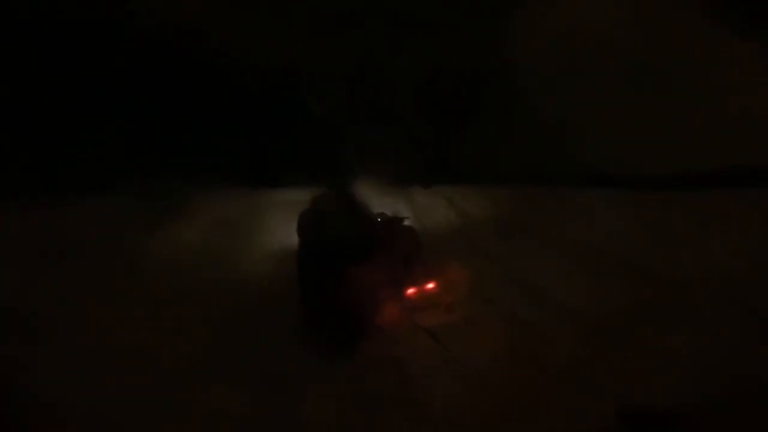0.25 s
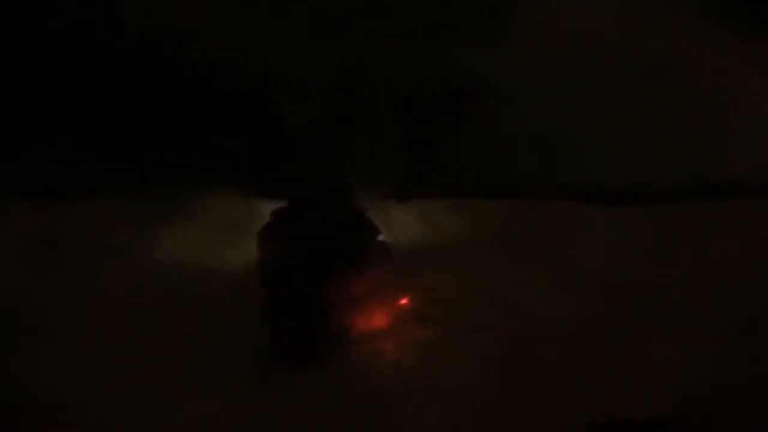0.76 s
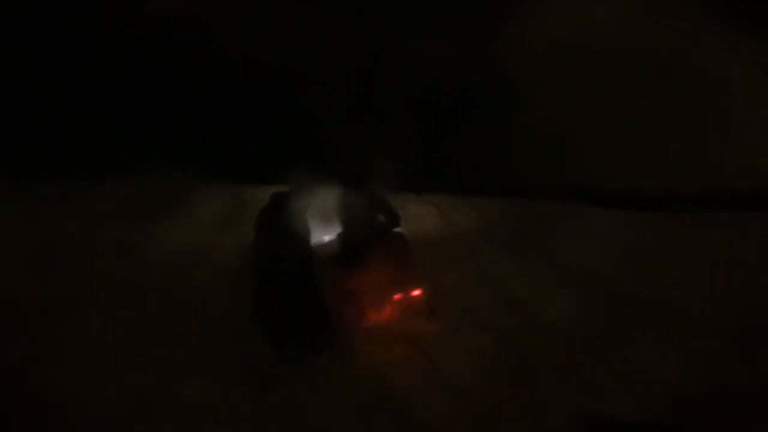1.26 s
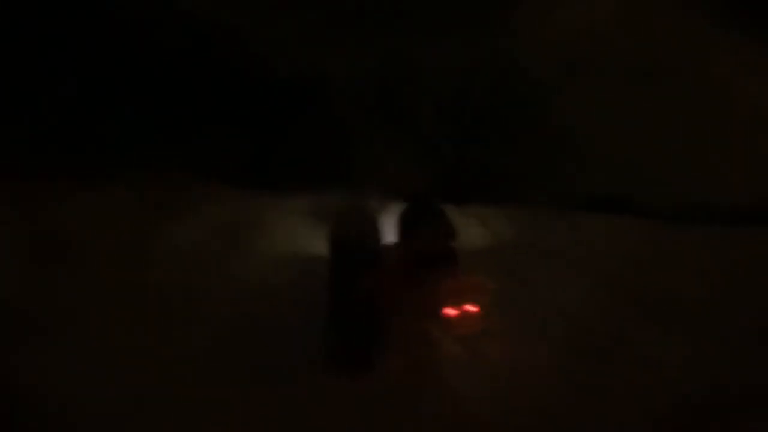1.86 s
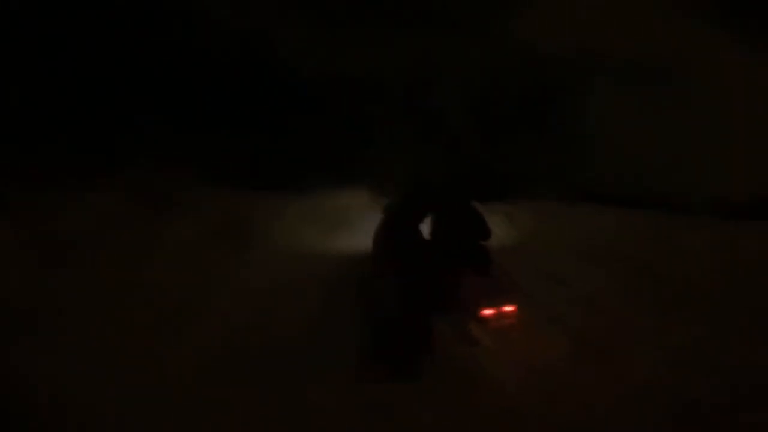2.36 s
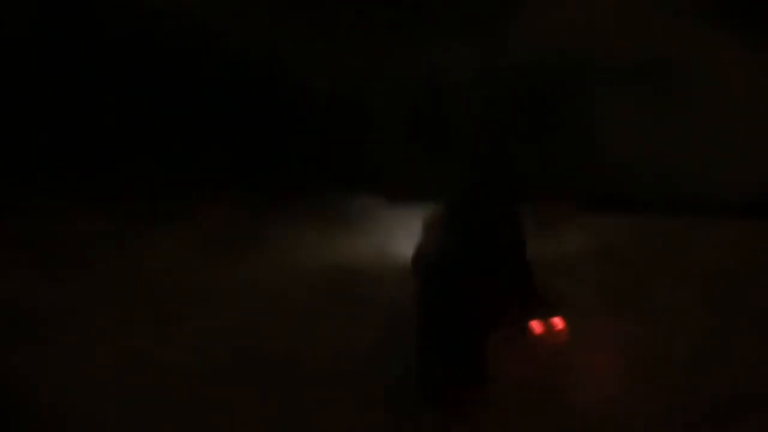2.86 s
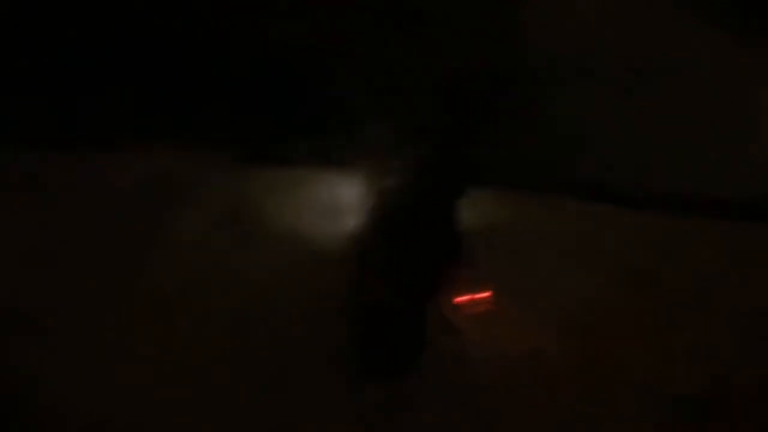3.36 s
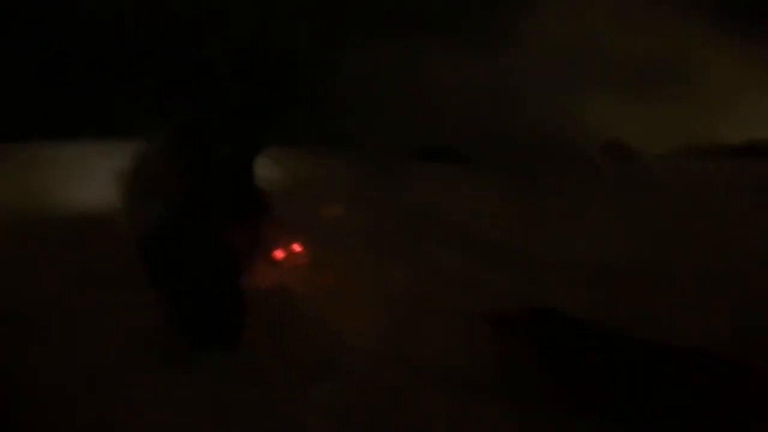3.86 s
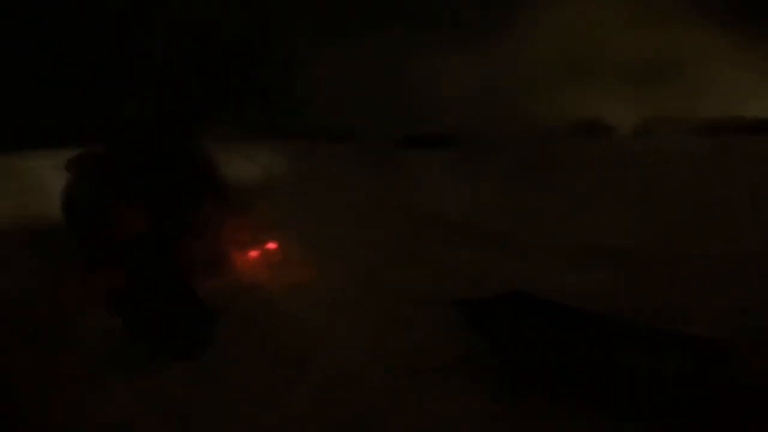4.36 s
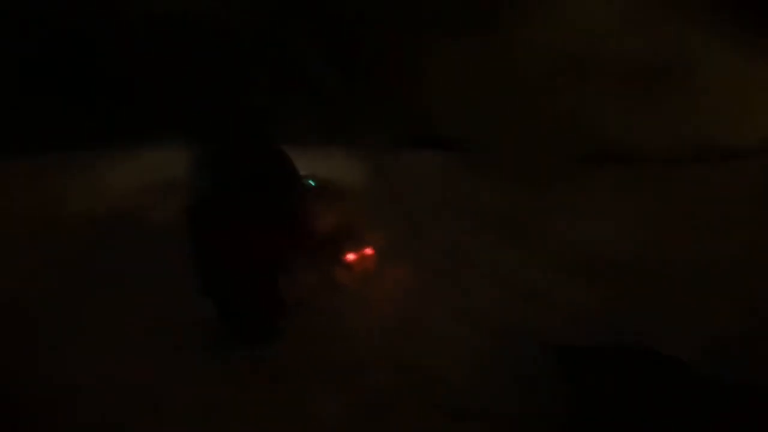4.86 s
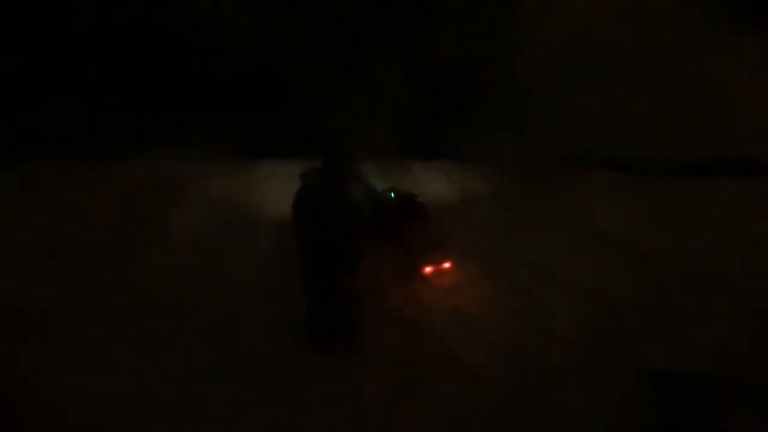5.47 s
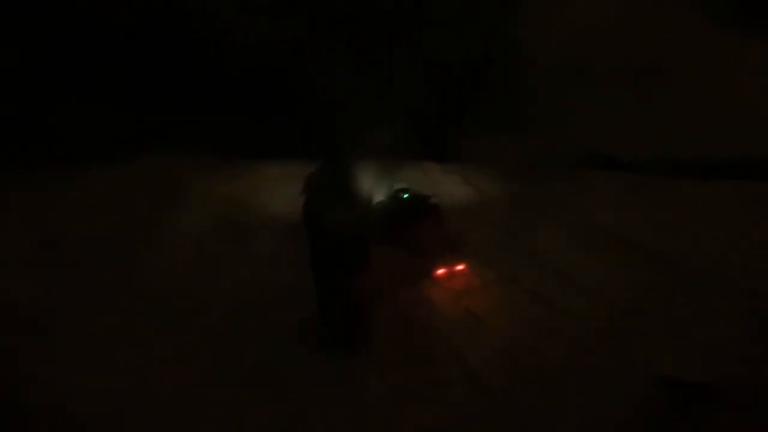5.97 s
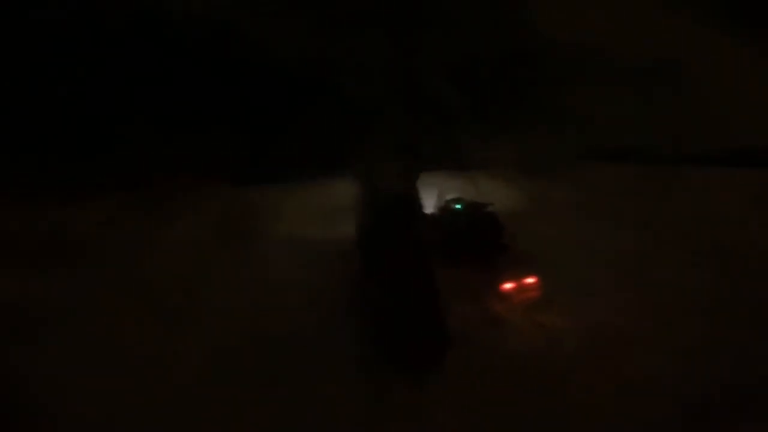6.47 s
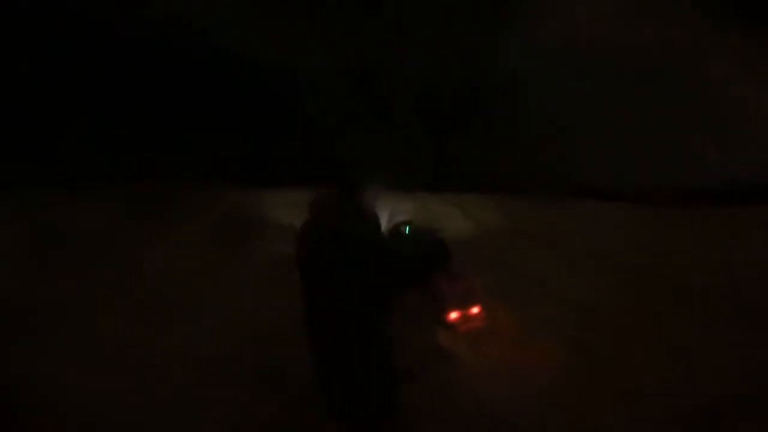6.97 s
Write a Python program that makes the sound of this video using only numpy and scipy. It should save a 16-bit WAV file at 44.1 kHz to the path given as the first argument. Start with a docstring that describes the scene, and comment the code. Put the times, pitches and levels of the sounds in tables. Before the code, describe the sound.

Outdoors on snow, a fairly quiet snowmobile engine throbs, rattles and hisses. Its pitch rises to a higher, whining drone, peaks briefly and falls back to an even idle that lasts to the end. From the top of the rev onward, a handful of much louder, very short ticks hit the microphone housing at uneven intervals. Soft gusts rumble on the microphone, and everything sounds dry.

```python
"""A two-stroke snowmobile idles on open snow at night, its exhaust throbbing while clutch, cylinders and
belt clatter and hiss through the cowling. Light wind rumbles on the hand-held mono microphone.
Just after one second the engine revs once to creep forward: the pipe rings and the clutch whine climbs.
Around three seconds it sinks back to a smoother idle and stays there. Sharp ticks ring the
microphone's housing along the way, the loudest between two and six seconds."""
import sys
import numpy as np
from scipy import signal
from scipy.fft import rfft, irfft
from scipy.io import wavfile
from scipy.ndimage import uniform_filter1d

SR = 44100
rng = np.random.default_rng(int(sys.argv[2]) if len(sys.argv) > 2 else 0)


def store_pcm(level_fs):
    """Save levels as 16-bit WAV."""
    pcm = np.round(np.clip(level_fs, -1, 1) * 32767).astype(np.int16)
    wavfile.write(sys.argv[1], SR, np.atleast_2d(pcm).T)


N = 318428
TIME = np.arange(N) / SR
FREQS = np.fft.rfftfreq(N, 1 / SR)


def undb(db):
    """Decibels to gain."""
    return 10 ** (np.asarray(db) / 20)


def unit(x):
    """Scale to rms 1."""
    return x / np.sqrt(np.mean(x ** 2))


def curve(points):
    """An automation line through (seconds, value) points."""
    return np.interp(TIME, *np.transpose(points))


def swell(s, length):
    """A bell-shaped fade around time s; length is the spread to either side."""
    return np.exp(-((TIME - s) / length) ** 2 / 2)


def drift(rate):
    """Smooth random motion of rms 1 that changes about rate times a second."""
    return unit(irfft(rfft(rng.standard_normal(N)) / (1 + (FREQS / rate) ** 4), N))


def noise(colour):
    """Noise of rms 1 through an EQ curve of (Hz, dB) points."""
    hz, db = np.transpose(colour)
    eq = undb(np.interp(np.log(FREQS + 1), np.log(hz), db))
    return unit(irfft(rfft(rng.standard_normal(N)) * eq, N))


def response(hz, modes):
    """Gain of a set of resonances at the given frequencies."""
    return sum(undb(db) / (1 + ((hz - centre) / width) ** 2 * 2) for centre, width, db in modes)


def ring(x, modes):
    """A sound coloured by resonances, rms 1."""
    return unit(irfft(rfft(x) * response(FREQS, modes), N))


# The wind's bass-heavy EQ. Each row: frequency in Hz, relative level in dB.
WIND_EQ = [(8, -1.5), (20, 4), (35, -11.5), (60, -17.5), (120, -25), (250, -46), (600, -69)]
# Gusts. Each row: peak time in seconds, spread in seconds, level in dB.
GUSTS = [(1.253, .07, -47), (2.47, 0.035, -41), (2.95, 0.15, -39.5), (3.317, 0.023, -47),
         (3.651, 0.027, -43), (3.902, 0.024, -35.5), (4.08, 0.059, -43.5), (4.446, 0.045, -47),
         (4.809, 0.068, -38), (5.418, 0.043, -40), (6.753, 0.12, -38), (6.986, .025, -40)]
# Gusts that bump the microphone. Each row: peak time and spread in seconds, pitch in Hz, level in dB.
BUMPS = [(1.963, 0.04, 71.7, -45), (3.895, .025, 31.6, -38), (3.904, 0.042, 159.9, -54),
         (6.722, 0.037, 143, -56)]

def wind(breeze_db=-48.5):
    """Low eddies at the microphone: a wandering breeze, gusts and a few soft bumps."""
    breeze = undb(breeze_db - 0.5 * drift(4.1))
    gust_power = sum((undb(db) * swell(s, length)) ** 2 for s, length, db in GUSTS)
    out = noise(WIND_EQ) * np.sqrt(breeze ** 2 + gust_power)
    for s, length, hz, db in BUMPS:
        out += ring(rng.standard_normal(N), [(hz, hz / 4, 0)]) * undb(db) * swell(s, length)
    return out


def node_dip(x, hz, depth_db, width=0.66):
    """A broad notch, applied twice: modes with a node at the struck spot hardly answer."""
    w = 2 * np.tan(np.pi * hz / SR)
    b, a = signal.bilinear([1, width * w * undb(-depth_db / 2), w * w], [1, width * w, w * w])
    return signal.lfilter(b, a, signal.lfilter(b, a, x))


# The microphone housing's ring. Each row: pitch in Hz, seconds to fade 60 dB, relative level in dB.
HOUSING_MODES = [(2100, 0.027, -15), (2660, 0.0054, 1), (2537, 0.026, -14), (3440, 0.0039, 5),
                 (4150, 0.0016, 11.5), (6080, 0.0063, 1), (6840, 0.0016, 7.5), (9120, 0.0019, 6),
                 (11900, .0012, -54), (14200, 0.0017, -57)]
# Ticks on the housing. Each row: start in seconds, peak in dB, treble tilt in dB per octave,
# notch centre in Hz, notch depth in dB, rebound gain, rebound delay in seconds.
TICKS = [(.0745, -40, 7, 14000, 1, .3, .00042), (0.434, -35.5, -2, 8000, 4, .3, .00042),
         (0.5727, -26.5, -7, 4500, 29, 0.77, 0.00045), (1.688, -34, 2, 9000, 2, .3, 0.00048),
         (2.1312, 1.5, -6.5, 12400, 1.5, 0.43, 0.000413), (3.0027, -7.5, 7, 8000, 8.5, 0.32, 0.00043),
         (3.0437, -25.5, -1, 4260, 4, 0.56, 0.00047), (3.2906, -12.5, 1.3, 6460, 11, 0.59, 0.000422),
         (3.3709, -3.5, 9.5, 8100, 11, 0.23, .00054), (4.1994, -31.5, 2, 9000, 9, .44, 0.00033),
         (4.6654, -23.5, -9, 3318, 47, 0.78, 0.00021), (4.9944, -0.5, 6, 4740, 34, 0.61, 0.000407),
         (5.3554, -31.5, 7, 9500, 5, .3, 0.00041), (5.5305, -6.5, 12, 11690, 16, 0.66, 0.00043),
         (5.7998, -23.5, 17, 10070, 15, .43, 0.00043), (5.8613, -16.3, 2, 5970, 4.5, 0.32, 0.00041),
         (6.1775, -40, 7, 4300, 2, .3, .00042)]

def ticks(tilt_from_hz=3700):
    """Tiny hard contacts at the microphone: each strikes, rebounds and briefly rings the housing."""
    out, t = np.zeros(N), TIME[:SR // 25]
    low_cut = signal.butter(5, 1550, "high", fs=SR, output="sos")
    for s, db, tilt, node_hz, node_db, rebound, delay_s in TICKS:
        tick = np.zeros(len(t))
        for hz, t60, mode_db in HOUSING_MODES:
            bright_db = tilt * max(np.log2(hz / tilt_from_hz), 0)  # a harder contact is brighter
            tick += undb(mode_db + bright_db - 60 * t / t60) * np.sin(2 * np.pi * hz * t)
        tick = node_dip(tick, node_hz, node_db)
        dulled = uniform_filter1d(tick, size=3)  # the rebound is softer, so it is duller
        tick += rebound * np.interp(t - delay_s, t, dulled, left=0)
        tick = signal.sosfilt(low_cut, tick)
        start = int(s * SR)
        out[start:start + len(t)] += undb(db) * tick / np.abs(tick).max()
    return out


# How openly the cowling faces the microphone. Each row: time in seconds, level offset in dB.
EXPOSURE = [(0, 1.5), (.3, -2.5), (.55, 0.6), (1.1, -3), (1.23, 4.5), (1.62, 5), (1.95, 1), (2.6, 3),
            (3.2, -3), (3.75, -4), (4.6, -1), (4.85, 5), (5.12, 7), (5.65, 1.5), (6.35, 6), (7.22, 0.5)]

def exposure_db(share):
    """Shading as a figure moves in front of the cowling; a negative share rides the opposite way."""
    return share * curve(EXPOSURE)


def effort(speed, full_surge_hz_per_s=100, full_run_down_hz_per_s=74, response_s=0.11):
    """Surge and run-down, each 0-1: how hard the engine gains or loses speed."""
    change = uniform_filter1d(np.gradient(speed) * SR, size=int(response_s * SR))
    return np.clip(change / full_surge_hz_per_s, 0, 1), np.clip(-change / full_run_down_hz_per_s, 0, 1)


def fader_db(law, speed, idle_hz=105.4, top_hz=179.5):
    """One part's level follows speed, effort and shading. Each law: idle level in dB, dB added at top
    speed, exponent of that rise, dB added in a surge, dB added in a run-down, share of the exposure."""
    idle_db, rise_db, steepness, surge_db, run_down_db, share = law
    rev = np.clip((speed - idle_hz) / (top_hz - idle_hz), 0, None)
    surge, run_down = effort(speed)
    effort_db = surge_db * surge + run_down_db * run_down
    return idle_db + rise_db * rev ** steepness + effort_db + exposure_db(share)


def clatter(firings, repeat, pulsing):
    """Metal contacts: one part recurs on every shaft turn, the rest is fresh; both pulse with firing."""
    points, harmonics = 2048, 130
    one_turn = unit(irfft(np.exp(2j * np.pi * rng.random(harmonics)), points))
    turns = firings / 2 + 0.0036 * drift(39)
    recurring = np.interp(turns % 1 * points, np.arange(points), one_turn)
    pulse = np.exp(pulsing * np.cos(2 * np.pi * firings) + 0.14 * drift(42))
    return (repeat * recurring + rng.standard_normal(N)) * pulse


def cowling(x, modes, speed):
    """Panels rung by the clatter, crossfading from their idle to their revved colour with speed."""
    idle, revved = (ring(x, np.array(modes)[:, [0, 1, column]]) for column in (2, 3))
    blend = np.interp(speed, [110, 168], [0, 1])
    return (1 - blend) * idle + blend * revved


# The airy top end. Each row: frequency in Hz, relative level in dB.
HISS_EQ = [(6000, -8.5), (7600, 2), (8300, 0), (9500, 1), (10300, -1), (11300, -1), (13000, -5.5),
           (15000, -11), (15600, -41)]
HISS_LAW = (-71.5, 13.5, 2, 1.5, -0.5, 0.3)  # every law reads as in fader_db

def hiss(firings, speed):
    """Fine hiss above the clatter, fluttering at the firing rate."""
    flutter = 1 + 0.19 * np.cos(2 * np.pi * firings)
    return noise(HISS_EQ) * flutter * undb(fader_db(HISS_LAW, speed) + 0.5 * drift(40))


# The belt's treble bands. Each row: centre and width in Hz, relative dB at idle and revved.
BELT_MODES = [(4303, 203, 2, 2), (4660, 146, -1, 5), (4960, 150, -6.5, -6), (5183, 210, -4.5, -1.5),
              (5776, 350, -7.5, -6.5), (5890, 76, -15.5, -7), (6400, 340, -10.5, -6.5),
              (7070, 440, -13.5, -10.5)]
BELT_LAW = (-61.5, 14.5, 1.4, 1.5, 0.5, 0.87)

def belt(firings, speed):
    """The drive belt sizzles in the cowling's highest resonances."""
    sizzle = cowling(clatter(firings, repeat=0.33, pulsing=0.092), BELT_MODES, speed)
    return sizzle * undb(fader_db(BELT_LAW, speed) + 0.5 * drift(8.6))


# One panel's ring. Each row: centre and width in Hz, relative dB at idle and revved.
PANEL_MODES = [(2418, 60, -4, 5), (2557, 114, -6, -6)]
# Its fader ride. Each row: time in seconds, level offset in dB.
PANEL_RIDE = [(0, 0.5), (2, -2), (3.48, 4), (3.7, -5), (4.25, -5), (4.85, -7), (5.15, 3.5), (7.22, 5.5)]
PANEL_LAW = (-59.5, 7, 0.5, 1.5, .5, 0.22)

def panel(firings, speed):
    """One cowling panel, shaken by each firing, rings out over the clatter."""
    ringing = cowling(clatter(firings, repeat=0.63, pulsing=0.29), PANEL_MODES, speed)
    return ringing * undb(fader_db(PANEL_LAW, speed) + curve(PANEL_RIDE) + 0.26 * drift(14))


# The cylinders' upper-mid bands. Each row: centre and width in Hz, relative dB at idle and revved.
CYLINDER_MODES = [(1820, 220, -6.5, -9), (2088, 194, -1.5, 2), (2255, 112, 0.5, -13), (2670, 170, -9, -4.5),
                  (2860, 175, -5, -21), (3096, 92, -0.5, -5), (3265, 290, -12.5, -6.5),
                  (3393, 79, -1.5, -15), (3606, 62, -2.5, -6), (3856, 126, -6, -8)]
CYLINDER_LAW = (-58.5, 10, 0.5, -1, -1, 1)

def cylinders(firings, speed):
    """The cylinders send a dense metallic rattle through the cowling."""
    rattle = cowling(clatter(firings, repeat=0.35, pulsing=0.022), CYLINDER_MODES, speed)
    return rattle * undb(fader_db(CYLINDER_LAW, speed) + 0.5 * drift(19))


# The clutch's midrange bands. Each row: centre and width in Hz, relative dB at idle and revved.
CLUTCH_MODES = [(903, 64, -7, -17), (1076, 120, -7.5, -14), (1235, 30, 0, -19), (1482, 160, 2, -1.5),
                (1640, 270, -8, -18), (1647, 56, -8, 1), (1830, 44, -8, -27)]
# Its whine before the cowling. Each row: multiple of the firing rate, relative level in dB.
WHINE_PARTIALS = [(9, -3.5), (9.5, -4), (10, -4), (12, 6.5), (14, -24), (16, -6)]
# Panel resonances that colour the whine. Each row: centre and width in Hz, gain in dB.
WHINE_MODES = [(1414, 140, 3), (1697, 51, 7.7)]
# The fader ride on rattle and whine. Each row: time in seconds, level offset in dB.
CLUTCH_RIDE = [(0, -2.5), (1.1, 0.5), (1.55, 1.5), (1.97, 0.5), (2.2, 6.5), (2.45, -1), (2.8, 2),
               (3.3, -3.5), (3.52, 3), (5.1, 1), (5.55, -1), (7.22, 0.3)]
CLUTCH_LAW = (-57, 6.5, 3.5, .8, 4.5, 0.43)

def clutch(firings, speed):
    """The clutch rattles and whines; each partial flares as it glides through a panel resonance."""
    level_db = fader_db(CLUTCH_LAW, speed) + curve(CLUTCH_RIDE)
    rattle = cowling(clatter(firings, repeat=0.49, pulsing=0.054), CLUTCH_MODES, speed)
    rattle *= undb(level_db + 0.98 * drift(4))
    whine = np.zeros(N)
    for order, db in WHINE_PARTIALS:
        gain = undb(db + 2.5 * np.tanh(drift(11))) * response(order * speed, WHINE_MODES)
        whine += gain * np.sin(2 * np.pi * order * firings + 1.25 * drift(38))
    surge, run_down = effort(speed)
    return rattle + whine * undb(level_db - 5 - run_down - 7 * surge)


# The dark exhaust noise. Each row: frequency in Hz, relative level in dB.
ROAR_EQ = [(60, -10), (130, -2), (250, -1.5), (400, -8), (520, -9.5), (750, -14.5), (1100, -16),
           (2000, -30), (4000, -38.5)]
ROAR_LAW = (-59, 10, 2.1, 2.5, 4.5, 0.05)

def exhaust_roar(angle, speed):
    """A bed of rushing exhaust that pulses faintly with each firing."""
    pulse = 1 + 0.046 * np.cos(angle)
    return noise(ROAR_EQ) * pulse * undb(fader_db(ROAR_LAW, speed) + 0.5 * drift(51))


# The exhaust's overtones. Each row: multiple of the firing rate, dB at idle, pulling and at top speed.
OVERTONES = [(.5, -63, -60, -57), (1.5, -69, -62, -59), (2, -63.5, -61, -54), (2.5, -113, -106, -89),
             (3, -63, -82, -64), (3.5, -73, -84, -69), (4, -76, -63, -80), (4.5, -118, -61, -101),
             (6, -81, -64, -72), (7, -91, -60.5, -109), (8.5, -74, -58.5, -84), (9, -83, -68, -59),
             (10, -94, -59, -58), (12, -88, -92, -86), (14.5, -82, -59, -64)]
# The silencer's resonance. Each row: centre and width in Hz, weight of its boost in dB.
SILENCER_MODES = [(227.6, 22.5, 1)]

def exhaust_overtones(angle, speed, opening):
    """Under load the unequal cylinders add half orders; those near the silencer's resonance swell."""
    # the overtones are weak in the opening idle and come up just as the rev begins
    idle_trim_db = np.interp(TIME, [1.05, 1.2], [-8.5, 0]) + 0.59 + exposure_db(-0.15)
    top = np.interp(speed, [152, 172], [0, 1])
    # in a surge and as the throttle closes, uneven firings make the overtones sputter
    closing = np.interp(TIME, [2.35, 2.55, 2.9, 3.3], [0, 0.082, 0.067, 0])
    sputter = (closing + 0.07 * effort(speed)[0]) * drift(35)
    out = np.zeros(N)
    for order, idle_db, pull_db, top_db in OVERTONES:
        loaded_db = pull_db + top * (top_db - pull_db)
        db = (1 - opening) * (idle_db + idle_trim_db) + opening * loaded_db
        gain = undb(db + 8 * response(order * speed, SILENCER_MODES) + 0.31 * drift(32))
        wobble = (0.25 + 0.075 * order) * drift(9)
        out += gain * np.sin(order * (angle + sputter) + wobble)
    return out


# How the exhaust answers the throttle. Each row: opening from 0 to 1, hum in dB, pipe ring in dB.
EXHAUST_LOAD = [(0, -55.5, -72), (.28, -46.5, -73), (.9, -47.1, -42)]

def load_db(opening):
    """Base levels of hum and pipe ring at a throttle opening."""
    openings, hum_db, pipe_db = np.transpose(EXHAUST_LOAD)
    return np.interp(opening, openings, hum_db), np.interp(opening, openings, pipe_db)


# The pipe's resonance. Each row: centre and width in Hz, relative level in dB.
PIPE_MODES = [(430, 57, 0)]
# Short barks of the pipe. Each row: peak time in seconds, spread in seconds, level in dB.
BARKS = [(1.35, 0.024, -51), (7.18, .025, -61)]

def pipe_ring(angle, speed, opening, run_down, lag_s=0.12):
    """The pipe answers the throttle late and picks out the overtone closest to its resonance."""
    gains = {order: response(order * speed, PIPE_MODES) ** 2 for order in (2.5, 3, 3.5, 4, 4.5)}
    tone = sum(gain * np.sin(order * angle + 0.17 * drift(17)) for order, gain in gains.items())
    tone /= np.sqrt(sum(gain ** 2 for gain in gains.values()))
    _, pipe_db = load_db(np.interp(TIME - lag_s, TIME, opening))
    # the pipe faces the microphone when the cowling does not
    level = undb(pipe_db - 40 * run_down + exposure_db(-1.43))
    barks = sum(undb(db) * swell(s, length) for s, length, db in BARKS)
    return tone * (level + barks) * undb(2.2 * drift(6.2))


# Speeds at which the exhaust booms. Each row: firing rate and width in Hz, boost in dB.
BOOMS = [(122, 8.8, 6), (178.6, 11, 7.5)]

def exhaust_hum(angle, speed, opening, run_down, throb_hz=8.6, throb_peak_s=0.024):
    """The firing tone follows the throttle, booms at certain speeds and collapses in the run-down."""
    hum_db, _ = load_db(opening)
    boom_db = sum(db * np.exp(-((speed - hz) / width) ** 2) for hz, width, db in BOOMS)
    level_db = hum_db + boom_db * (1 - run_down) - 14 * run_down
    # before the rev the mixture burns unevenly and the note throbs
    depth_db = np.interp(TIME, [1.1, 1.4], [3.8, 0.2])
    throb_db = depth_db * np.cos(2 * np.pi * (throb_hz * (TIME - throb_peak_s) + 0.25 * drift(1)))
    return undb(level_db + throb_db + 0.18 * drift(24)) * np.sin(angle + 0.075 * drift(8.4))


# The throttle move. Each row: time in seconds, opening from 0 to 1.
THROTTLE = [(0, 0.27), (1.15, 0.26), (1.45, 0.87), (2.5, 0.97), (2.72, 0.52), (3.2, 0.05)]

def exhaust(firings, speed, hold_s=0.041):
    """Firing pulses sound hum, overtones, pipe and roar; the note holds briefly as the speed falls."""
    angle, opening = 2 * np.pi * firings, curve(THROTTLE)
    run_down = np.interp(TIME - hold_s, TIME, effort(speed)[1])
    tones = exhaust_hum(angle, speed, opening, run_down)
    tones += exhaust_overtones(angle, speed, opening)
    tones += pipe_ring(angle, speed, opening, run_down)
    return np.sqrt(2) * tones + exhaust_roar(angle, speed)


# The engine's pitch line: idle, one rev, idle. Each row: time in seconds, firing rate in Hz.
ENGINE_SPEED = [(0, 100.2), (1.12, 101.1), (1.22, 105.5), (1.35, 121.3), (1.47, 141.8), (1.59, 147.4),
                (1.89, 148.7), (2.13, 158.2), (2.35, 176.9), (2.56, 175.6), (2.93, 128.9), (3.2, 107.8),
                (3.5, 101.8), (4.77, 103.4), (5.55, 102.7), (6.2, 104.5), (6.7, 104.1), (7.22, 102.9)]

def snowmobile():
    """One crankshaft, wavering slightly in speed, drives the exhaust and all the machinery."""
    speed = curve(ENGINE_SPEED)
    firings = np.cumsum(speed * (1 + 0.002925 * drift(10.53))) / SR  # running count, two a shaft turn
    return sum(part(firings, speed) for part in (exhaust, clutch, cylinders, panel, belt, hiss))


def scene():
    """Snow returns no echo; both channels carry the same dry mix."""
    return np.tile(snowmobile() + wind() + ticks(), (2, 1))


def record(dry):
    """A steep high cut, then hard clipping at full scale."""
    high_cut = signal.ellip(8, 0.2, 80, 15150, fs=SR, output="sos")
    return np.clip(signal.sosfilt(high_cut, dry), -1, 1)


dry = scene()
out = record(dry)
store_pcm(out)
```